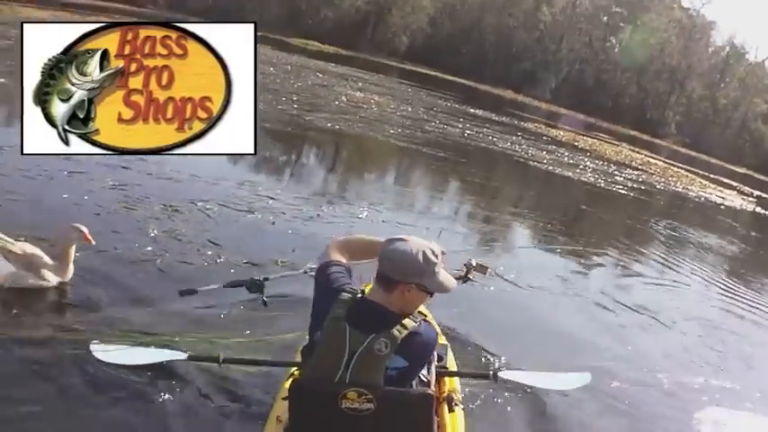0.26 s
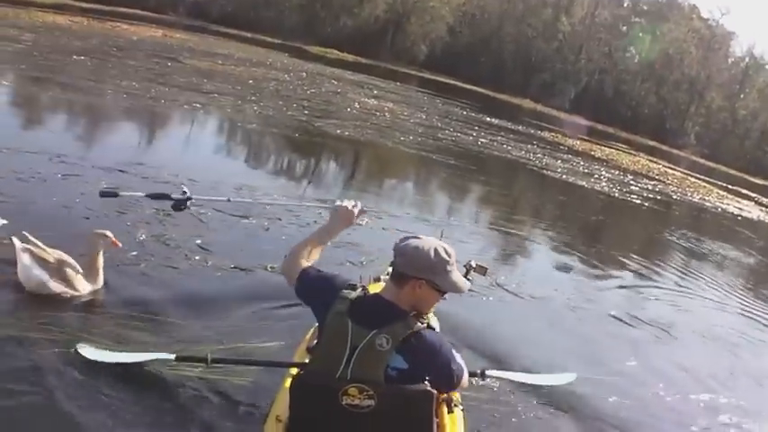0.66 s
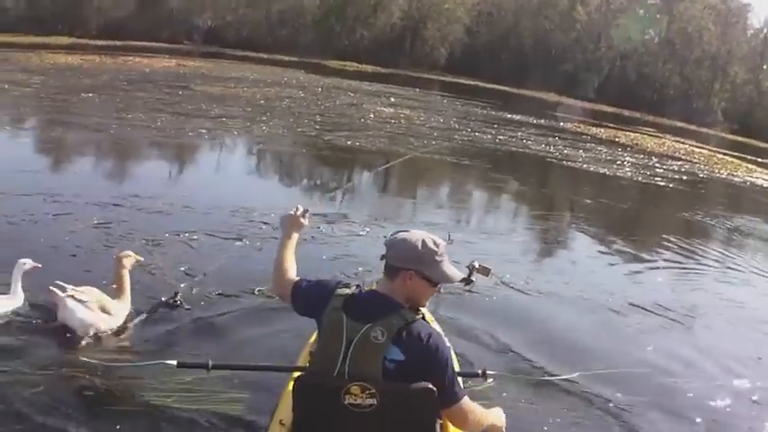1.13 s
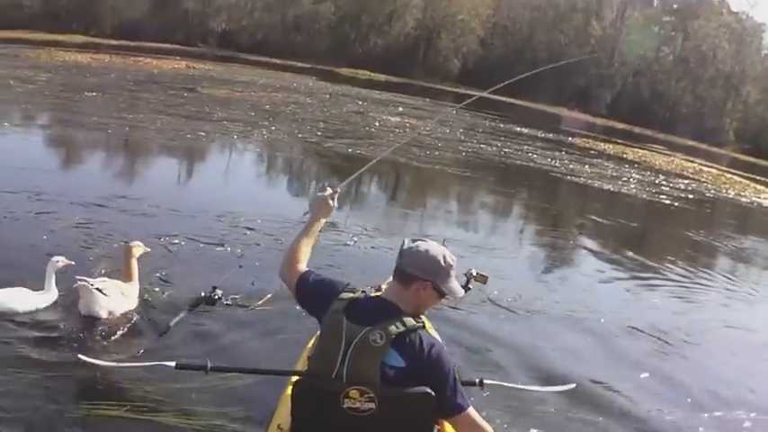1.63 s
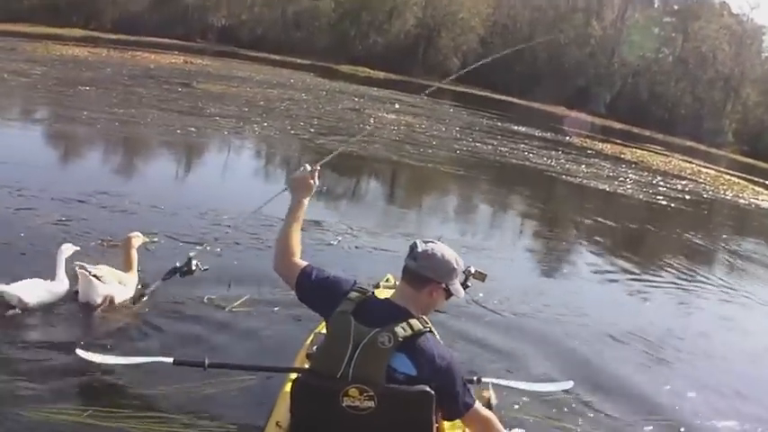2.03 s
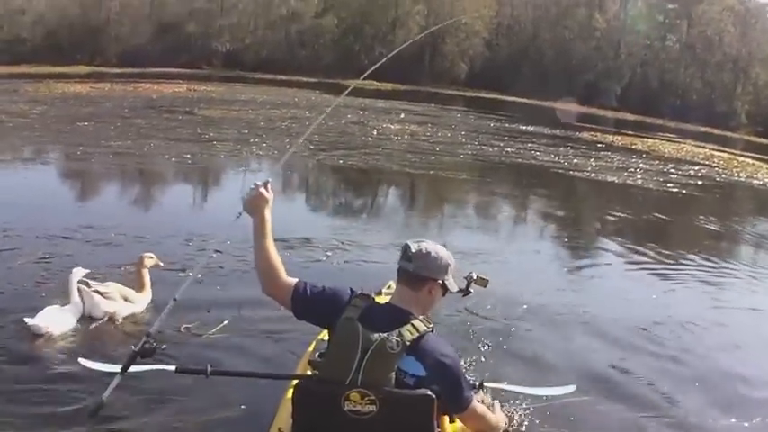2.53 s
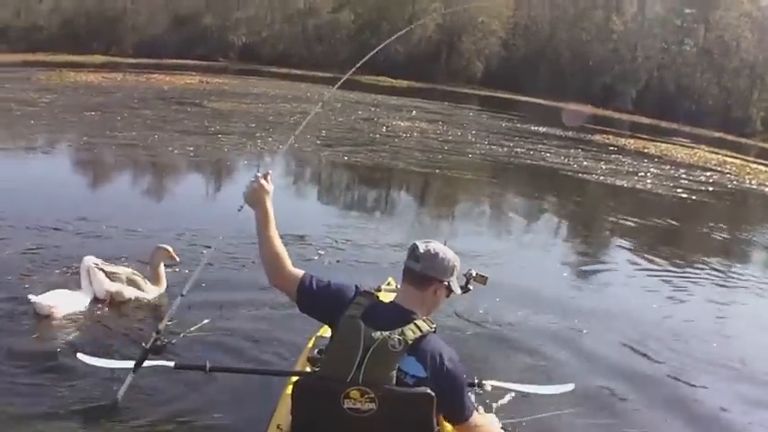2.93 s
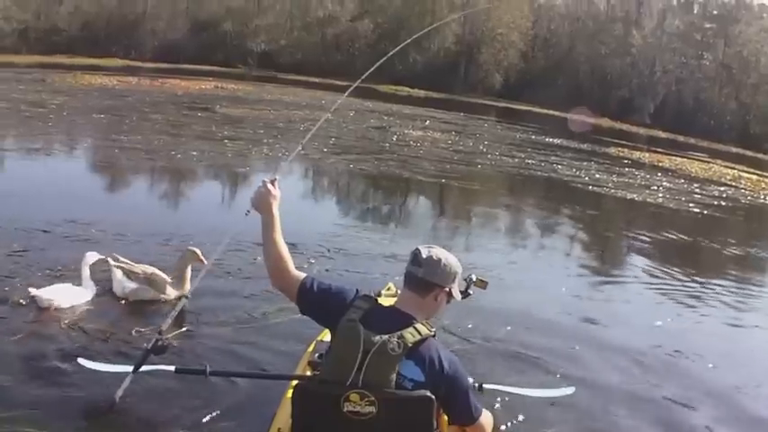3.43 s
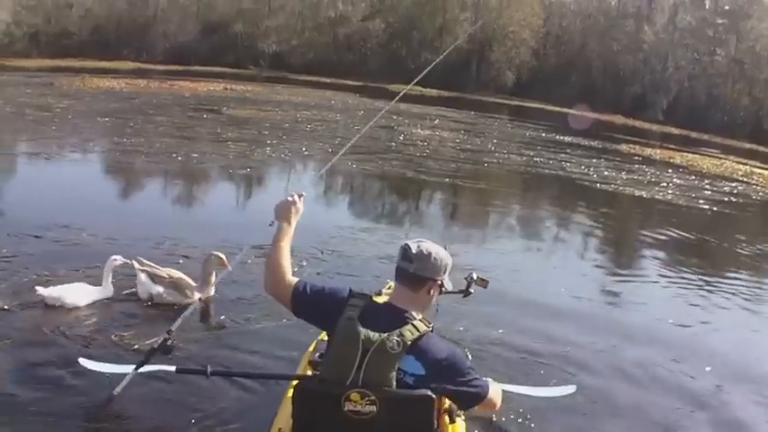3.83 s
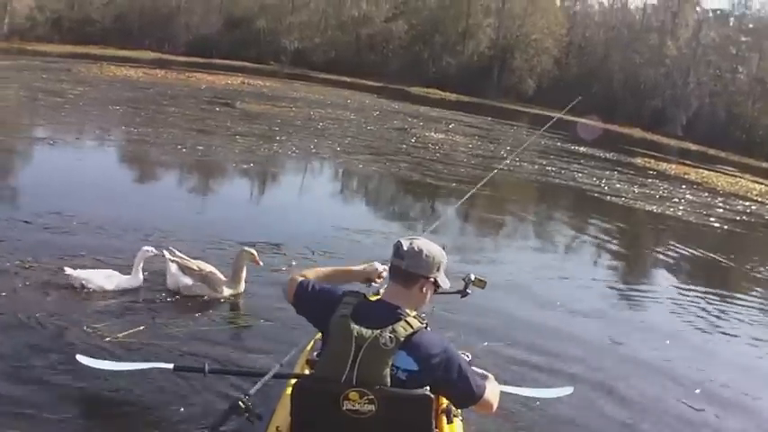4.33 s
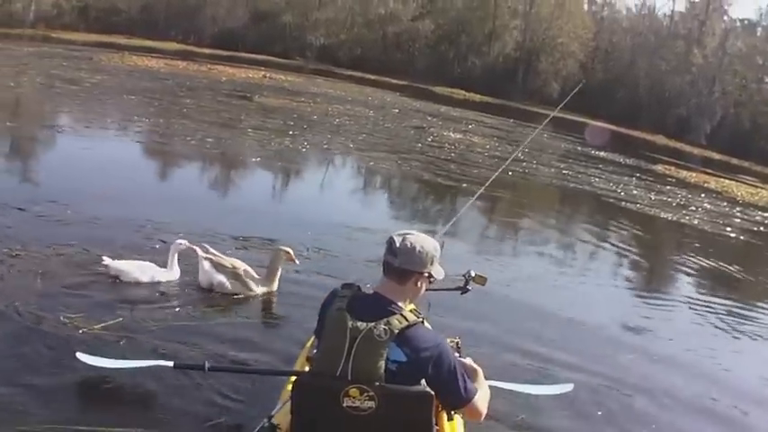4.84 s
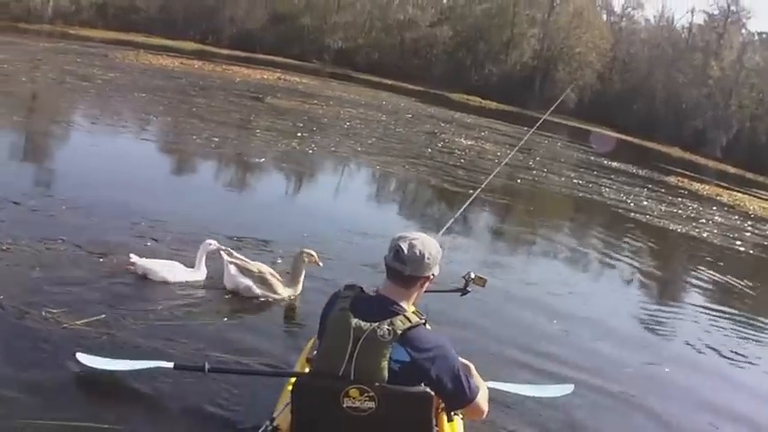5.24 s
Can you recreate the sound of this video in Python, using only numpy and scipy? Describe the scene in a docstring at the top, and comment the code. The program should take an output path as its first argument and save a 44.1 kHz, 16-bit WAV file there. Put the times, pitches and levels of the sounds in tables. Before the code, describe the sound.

Water splashes, bubbles and sloshes beside a kayak, with small metal jingles, low wind rumble and one sharp hard knock near the end.

```python
"""Water splashes and sloshes close beside a kayak on a calm river: crowds of ringing bubbles, droplets,
gurgles, plops and filtered surges. Small metal tackle jingles as groups of decaying modes; the plastic hull
takes bumps and one sharp knock, among faint high ticks, each a crack with ringing modes. Two close microphone
ports of a camera on the stern take uneven wind noise and single buffets, over faint hiss and a thin whine."""
import sys
import numpy as np
from scipy import signal
from scipy.fft import rfft, irfft
from scipy.io import wavfile
from scipy.ndimage import uniform_filter1d

SR = 44100
rng = np.random.default_rng(int(sys.argv[2]) if len(sys.argv) > 2 else 0)


def dump(signal):
    """Clip the signal to [-1, 1] and save it as 16-bit WAV at the path in sys.argv[1]."""
    limited = np.clip(np.atleast_2d(signal).T, -1, 1)
    pcm = np.round(limited * 32767).astype(np.int16)
    wavfile.write(sys.argv[1], SR, pcm)


N = 242197
TIME = np.arange(N) / SR

# Hiss under everything. Each row: frequency in Hz, relative density in dB.
HISS_SPECTRUM = [(30, 2), (200, 1), (500, 0), (1500, -2), (3000, -5), (6000, -7), (9000, -13), (12000, -11),
                 (15500, -11.5)]
# Low turbulence at the microphone. Each row: frequency in Hz, relative density in dB.
WIND_SPECTRUM = [(15, 0), (30, 0), (60, -4), (120, -7.5), (200, -19), (400, -32), (800, -52)]
# Strength of the breeze, before puffs and port gains. Each row: time in seconds, level in dB.
BREEZE_LEVEL = [(0, -36), (.45, -34.5), (.67, -46.5), (.85, -34), (1.05, -47.5), (1.23, -29.5), (1.38, -39),
                (2.35, -33.5), (2.8, -45.5), (3.4, -34), (3.7, -46), (4.22, -37.5), (4.42, -47),
                (4.59, -37), (5.07, -32.5), (5.23, -50), (5.35, -36.5), (5.49, -37.5)]
# Single eddies striking the ports. Each row: centre in seconds, level of the left port in dB,
# pitch in Hz, right port relative to left in dB.
EDDIES = [(0.089, -17, 103, -13), (1.487, -24.5, 89, -2), (2.399, -24, 80, -9.5), (2.549, -28.5, 60, -5),
          (3.045, -26.5, 39.3, -4.5), (3.378, -15, 114, -20), (4.028, -26.5, 110, -8.5),
          (4.72, -18, 112.3, -7), (5.032, -20.5, 105.5, 1), (5.076, -7.5, 125, -12), (5.345, -21, 138, -32)]
# Faint gliding whistles. Each row: start in seconds, length in seconds, level in dB,
# first pitch in Hz, last pitch in Hz.
WHISTLE_GLIDES = [(3.66, .125, -62, 4150, 3760), (4.062, .065, -58, 476, 950)]
# Faint high ticks, some perhaps of the tackle, with bumps and water slaps on the hull.
# Each row: start in seconds, level in dB, brightness in dB an octave.
BLOWS = [(0.0239, -31.5, 10), (.157, -38.5, 3), (0.416, -30, -9), (.497, -29.5, -7), (.526, -28, -6),
         (1.437, -24, 0), (1.785, -18.5, 0), (2.0126, -19, 10), (2.076, -18.5, 7), (2.603, -41, 22),
         (3.155, -48, 22.5), (3.349, -40, 5), (4.062, -44, 12), (4.377, -43, 24), (4.5874, -6.5, 3.5),
         (4.7652, -44, -2), (4.8924, -35.5, -4)]
# Modes of the hull and the gear lying on it, before each blow's small detuning.
# Each row: frequency in Hz, relative level in dB, time to fade by 60 dB in seconds.
HULL_AND_GEAR_MODES = [(407, -9, 0.13), (587, -1.5, 0.075), (710, -1.5, 0.085), (985, 6.5, 0.036),
                       (1203.7, 0.5, 0.047), (1697, 6.5, 0.015), (1917, 1, 0.028), (2290, -3.5, 0.042),
                       (2440, -5.5, 0.0323), (2563, -7.5, 0.04), (2860, 0.5, 0.016), (3440, -8.5, 0.03),
                       (4636, -11, 0.037), (5040, -16, 0.015), (7040, -9.5, 0.0097)]
# Shakes of the tackle; where it is struck decides which rings speak. Each row: start in seconds,
# chatter time in seconds, then the level in dB of each of four rings, low to high.
SHAKES = [(1.156, 0.0088, -38, -27.5, -28, -47), (1.183, .012, -27, -28.5, -34, -49),
          (1.328, .014, -32.5, -42, -28.5, -29), (1.657, .0065, -37.5, -36, -31, -48),
          (1.8897, .005, -27, -27, -42, -29), (1.917, .028, -38, -32, -28, -37),
          (1.962, .01, -41, -36, -31, -45), (2.0104, .007, -19, -18, -19, -32),
          (2.045, 0.011, -30, -34, -43, -44), (2.069, 0.0057, -28, -28, -30.5, -34),
          (2.1766, 0.0059, -34.5, -29.5, -34, -44), (2.3095, 0.0066, -25, -18.5, -25, -23),
          (2.35, .012, -36.5, -36, -34, -42), (2.5068, .024, -32.5, -39, -35.5, -46),
          (2.545, 0.013, -46, -43, -37, -45), (2.8515, 0.011, -58, -53, -56, -67),
          (3.3102, .022, -45.5, -45, -41.5, -52), (3.352, 0.0048, -46, -53, -54, -55),
          (4.317, .005, -48, -49, -39, -64), (4.4834, .022, -42, -45, -42.5, -49),
          (4.8185, 0.0091, -55, -60, -50, -59)]
# Metal modes; those of one ring sound together. Each row: ring number from 0, settled frequency in Hz
# before each shake's detuning, relative level in dB, time to fade by 60 dB in seconds.
METAL_MODES = [(0, 6485, -7.5, .42), (0, 6548, -4, .12), (0, 6640, -5, .05), (1, 9125, -8.5, .16),
               (1, 9230, -2, .06), (1, 9760, -9, .035), (2, 11940, -6, .07), (2, 12085, -6, .16),
               (2, 12290, -6, .06), (2, 12540, -10, .06), (2, 15250, -9, .09), (3, 13440, -2, .09),
               (3, 13560, -6, .13)]
# Water trickling back after the splashes. Each row: time in seconds, level in dB.
TRICKLE_LEVEL = [(.7, -75), (1.2, -45), (2.35, -50), (2.7, -63), (3.35, -56), (3.6, -70)]
# Air pockets closing. Each row: start in seconds, level in dB before the 1 dB lift in plops(),
# first pitch in Hz, pitch rise in octaves a second.
AIR_POCKETS = [(.436, -23.5, 446, 7.5), (.497, -27, 337, -6), (.575, -24, 265, -4), (1.04, -23.5, 787, 19),
               (1.138, -14.5, 732, -7.5), (1.154, -21, 1300, 32), (1.282, -17.5, 288.9, -2.5),
               (1.924, -16.5, 540, 2), (1.939, -17, 463.6, -5), (2.243, -35, 1378, 58),
               (2.276, -27.5, 2800, -7), (2.288, -27, 1600, 57), (3.037, -37, 1278, 1),
               (3.228, -34, 558.5, 52), (3.488, -40, 1102, 12), (4.489, -41, 5100, -3),
               (4.698, -37, 2340, 1), (4.791, -40, 1300, -3), (4.819, -28, 1020, 103),
               (4.831, -34.5, 3520, 3.5), (4.893, -26, 680, 4.5)]
# Deep heaves of water. Each row: centre in seconds, level in dB, Gaussian half width in seconds.
HEAVES = [(0.095, -42, 0.12), (0.435, -31.5, 0.026), (0.53, -36.5, 0.03), (1.262, -32, 0.046),
          (1.479, -35.5, 0.0301), (1.779, -31, 0.0074), (2.355, -43, 0.039), (3.38, -40, .015)]
# Broad smacks against the side. Each row: centre in seconds, level in dB, Gaussian half width in seconds.
SIDE_SMACKS = [(1.7822, -18, 0.0044), (2.024, -24, 0.0085)]
# Hollows in the water that gurgle as they open or close. Each row: start in seconds, length in seconds,
# level in dB, first pitch in Hz, last pitch in Hz.
HOLLOWS = [(1.012, 0.039, -35.5, 1700, 2060), (1.107, .018, -28, 795, 940), (1.286, 0.024, -34, 1150, 1700),
           (1.51, .045, -39.5, 1277, 1520), (1.564, .085, -41.5, 1200, 620),
           (1.619, 0.024, -34.5, 1193, 950), (1.863, 0.036, -34, 620, 720), (2.158, .045, -39, 560, 380),
           (2.397, .05, -42, 1246, 2710), (2.734, 0.044, -45.5, 1250, 518), (2.857, 0.029, -49, 600, 2420)]
# Spray thrown up and falling back. Each row: time in seconds, level in dB before the 5 dB lift in spray().
SPRAY_FORCE = [(0, -51), (.7, -63), (.84, -45.5), (.99, -51.5), (1.03, -40), (1.22, -37.5), (1.45, -43),
               (1.95, -40.5), (2.15, -45), (3, -61.5)]
# Colour of the droplets. Each row: frequency in Hz, gain in dB.
DROPLET_SPECTRUM = [(300, -19), (900, -12), (2000, 4.5), (3100, -6), (4300, 1), (7000, 0), (10000, -2),
                    (12000, -0.5), (15500, -7.5)]
# Size of the trapped air pockets. Each row: time in seconds, typical bubble pitch in Hz.
BUBBLE_PITCH = [(0, 526), (.55, 483), (.82, 1000), (1.55, 1490), (1.94, 1000), (2.2, 745), (2.45, 1160),
                (3.3, 950)]
# Separate sloshes beside the boat. Each row: start in seconds, level in dB,
# time to fade by 20 dB in seconds.
SLOSH_SURGES = [(-.03, -38.5, 0.48), (.2, -39, 0.46), (0.402, -31.5, 0.08), (.497, -40.5, 0.01),
                (.73, -50.5, 4), (.8, -31, 0.6), (1.0, -33.5, 0.2), (1.093, -27.5, 0.29), (1.27, -34, 0.2),
                (1.5, -46, 1), (1.59, -37, 0.34), (1.76, -32.5, 0.3667), (1.904, -27, 0.1341),
                (1.99, -31.5, 0.2092), (2.149, -38.5, 0.13), (2.3, -48, 0.46), (2.405, -47, 0.0574),
                (2.72, -51, 0.07), (3.211, -43.5, 0.18)]


def amp(db):
    """Decibels to gain."""
    return 10 ** (np.asarray(db) / 20)


def unit(x):
    """Scales to an rms of one."""
    return x / np.sqrt(np.mean(x ** 2) + 1e-20)


def curve(rows):
    """A table of (seconds, value) at every sample."""
    return np.interp(TIME, *np.transpose(rows))


def colour(x, points):
    """Filters by a spectrum of (Hz, dB) points, joined on a logarithmic frequency scale."""
    hz, db = np.transpose(points)
    bins_hz = np.fft.rfftfreq(N, 1 / SR)
    gain_db = np.interp(np.log(bins_hz + 1), np.log(hz), db)
    return irfft(rfft(x) * amp(gain_db), N)


def wander(rate_hz):
    """Slow random motion of rms one."""
    knots = rng.standard_normal(1500)
    return unit(np.interp(2 * rate_hz * TIME, np.arange(len(knots)), knots))


def add(mix, s, sound):
    """Mixes a sound in at time s."""
    part = mix[..., max(round(s * SR), 0):][..., :sound.shape[-1]]
    part += sound[..., :part.shape[-1]]


def ports(x, lead, left_db):
    """Two close microphone ports: the left hears the sound lead samples sooner, left_db louder."""
    turn = np.exp(1j * np.pi * np.fft.rfftfreq(N) * lead)  # half the lead for each port
    spectrum = rfft(x)
    left = irfft(spectrum * turn, N) * amp(left_db / 2)
    right = irfft(spectrum / turn, N) / amp(left_db / 2)
    return np.array([left, right])


def bubble(hz, rise, t60, onset_cycles=0.56):
    """An air pocket rings and dies away, its pitch moving by rise octaves a second, up 1.5 octaves at most."""
    t = np.arange(int(t60 * SR) + 8) / SR
    turns = np.cumsum(hz * 2 ** np.minimum(rise * t, 1.5)) / SR
    decay = np.exp(-np.log(1000) * t / t60)
    return np.sin(2 * np.pi * turns) * decay * (1 - np.exp(-turns / onset_cycles))


def impacts(per_s, spread_db):
    """Sparse random clicks, a few of them large."""
    train, count = np.zeros(N), int(per_s * N / SR)
    at, size, sign = rng.random((4000, 3))[:count].T
    heights = amp(-spread_db * np.log(np.maximum(size, .04)))
    train[(at * N).astype(int)] = heights * np.sign(sign - .5)
    return train


def steady(x, window_s):
    """Evens out slow swells and keeps the grain."""
    window = int(window_s * SR)
    power = uniform_filter1d(uniform_filter1d(x ** 2, window), window)
    return x / np.sqrt(abs(power) + 0.02 * np.mean(x ** 2))


def swells(rows):
    """Sums Gaussian surges of (centre s, level dB, half width s)."""
    return sum(amp(db) * np.exp(-.5 * ((TIME - s) / width) ** 2) for s, db, width in rows)


def glide(length, first_hz, last_hz):
    """A complex tone that slides between two pitches, swelling and fading."""
    u = np.linspace(0, 1, max(int(length * SR), 64))
    phase = 2 * np.pi * np.cumsum(first_hz * (last_hz / first_hz) ** u) / SR
    return np.exp(1j * phase) * np.sin(np.pi * u ** .75)


def background(hiss_db=-51.0, whine_db=-40.0, whine_hz=7867, left_db=0.34):
    """Even hiss and the camera's thin electrical whine, out of step between the channels."""
    noise = rng.standard_normal((2, N)) + 0.53 * rng.standard_normal(N)  # own to each channel, plus shared
    hiss = amp(hiss_db) * unit(colour(noise, HISS_SPECTRUM)) * amp([[left_db], [0]])
    phase = 2 * np.pi * whine_hz * TIME + np.array([[0], [1.4]])
    return hiss + amp(whine_db) * unit(np.sin(phase))


def whistles():
    """Thin clean tones whose pitch glides, faint beside the water."""
    out = np.zeros(N)
    for s, length, db, first_hz, last_hz in WHISTLE_GLIDES:
        add(out, s, amp(db) * unit(glide(length, first_hz, last_hz).real))
    return out


def wind(left_db=3.0, right_db=0.0, lumps_db=4.5, shared=0.0855, edge_db=-13, edge_growth=0.94):
    """Lumpy turbulence, partly separate at each port; strong gusts add a rougher upper edge."""
    puffs_db, puffs_hz = 1.5, 6  # the breeze comes in uneven puffs
    gust_db = curve(BREEZE_LEVEL) + puffs_db * wander(puffs_hz)
    edge_gain_db = edge_db + edge_growth * np.minimum(gust_db + 29.0, 10)
    edge_spectrum = [(60, 8.5), (160, 1.5), (300, -9.5), (600, -28.0), (1500, -104)]
    common, out = rng.standard_normal(N), []
    for port_db in (left_db, right_db):
        eddies = np.sqrt(shared) * common + np.sqrt(1 - shared) * rng.standard_normal(N)
        lumps = amp(lumps_db * wander(rate_hz=24.7))
        rumble = steady(unit(colour(eddies, WIND_SPECTRUM)) * lumps, window_s=0.12)
        edge = unit(colour(eddies, edge_spectrum)) * lumps
        out.append(amp(gust_db + port_db) * (rumble + edge * amp(edge_gain_db)))
    return np.array(out)


def buffets(width_cycles=0.35, flutter_db=-15, flutter_s=0.0061):
    """A single eddy gives the microphone a short push and pull with a fluttering edge."""
    out, t = np.zeros((2, N)), np.arange(-2048, 2048) / SR
    band = signal.butter(2, (150, 420), "band", fs=SR)
    for s, db, hz, right_db in EDDIES:
        flutter = unit(signal.lfilter(*band, rng.standard_normal((2, len(t))))) / np.cosh(t / flutter_s)
        push = -np.sin(2 * np.pi * hz * t) / np.cosh(t * hz / width_cycles)
        add(out, s + t[0], amp([[db], [db + right_db]]) * (push + amp(flutter_db) * flutter))
    return out


def knocks(crack_db=1, crack_s=0.00094, rattle_db=-9, rattle_s=0.011):
    """Each blow or tick is a short crack, a ring of the modes and a brief dull rattle."""
    out, t = np.zeros(N), TIME[:SR // 5]
    rattle_spectrum = [(80, 0.5), (500, -9.5), (2500, -9), (3800, -13), (7000, -19.5), (15000, -35)]
    crack_spectrum = [(200, -8.0), (1500, -5.0), (6500, 3), (9000, -4), (15000, -8)]
    rattle = unit(colour(rng.standard_normal(N), rattle_spectrum))
    crack = unit(colour(rng.standard_normal(N), crack_spectrum))
    bounce_s, bounce_db = .0124, -14  # every blow lands a second time, more softly
    bounces = [(s + bounce_s, db + bounce_db, tilt_db) for s, db, tilt_db in BLOWS]
    for s, db, tilt_db in [*BLOWS, *bounces]:
        ring = np.zeros(len(t))
        for hz, mode_db, t60 in HULL_AND_GEAR_MODES:
            level = amp(mode_db + tilt_db * np.log2(hz / 1500)) * rng.choice([-1, 1])
            tone = np.sin(2 * np.pi * hz * rng.uniform(0.98, 1.012) * t)
            ring += level * tone * np.exp(-np.log(1000) * t / t60)
        here = slice(round(s * SR), round(s * SR) + len(t))
        blow = ring / ring[:256].std()
        blow += amp(rattle_db) * rattle[here] * np.exp(-t / rattle_s)
        blow += amp(crack_db + tilt_db) * crack[here] * np.exp(-t / crack_s)
        add(out, s, amp(db) * blow / blow[:256].std())  # level is set by the first 256 samples
    return ports(out, lead=-0.51, left_db=1.5)


def tackle(scrape_db=-11, rebound=0.76):
    """Loose metal parts strike, chatter against each other and ring out, their pitch settling as they part."""
    out, t, head = np.zeros(N), TIME[:SR // 3], SR // 40  # levels are set by the first 25 ms
    hang_pull = .004  # the parts hang a little differently at each shake
    contact_pull, contact_s = .011, .014  # parts pressed together pull the pitch off until they separate
    group, hz, mode_db, t60 = np.transpose(METAL_MODES)[:, :, None]
    for s, chatter_s, *rings_db in SHAKES:
        pull, hang = rng.standard_normal((2, *hz.shape))
        tuned = hz * (1 + hang_pull * hang + contact_pull * pull * np.exp(-t / contact_s))
        modes = np.exp(2j * np.pi * np.cumsum(tuned, axis=1) / SR - np.log(1000) * t / t60)
        rings, ticks = np.zeros(modes.shape), np.zeros(len(t))
        for k in range(7):
            delay = chatter_s * k * rng.uniform(0.3, .5)
            turned = modes * np.exp(2j * np.pi * rng.random(hz.shape))  # a new phase at each strike
            add(rings, delay, rebound ** k * turned.real)
            add(ticks, delay, rebound ** k * rng.standard_normal(len(t)) * np.exp(-t / .0015))
        gains = amp(np.array(rings_db)[group.astype(int)] + mode_db)
        shake = (gains * rings / rings[:, :head].std(axis=1, keepdims=True)).sum(0)
        scrape = amp(scrape_db) * np.linalg.norm(gains) * ticks / ticks[:head].std()
        add(out, s, shake + scrape)
    return ports(colour(out, [(500, -18), (3000, -3), (6000, 1.0)]), lead=-0.38, left_db=0.5)


def trickle(per_s=8, cycles=32):
    """Separate small drips, each a short rising chirp."""
    out = np.zeros(N)
    for hz in np.geomspace(700, 3200, num=12):
        drip = bubble(hz, hz / 40, cycles / hz)
        out += signal.oaconvolve(impacts(per_s, spread_db=4), drip)[:N]
    return ports(unit(out) * amp(curve(TRICKLE_LEVEL)), lead=0, left_db=0)


def plops(level_db=1, slap_db=-11, slap_s=0.0044):
    """Single large bubbles, each begun by a small wet slap."""
    out = np.zeros(N)
    t60_at_1khz, size_law = 0.0492, 0.23  # seconds; bigger, deeper bubbles ring longer
    for s, db, hz, rise in AIR_POCKETS:
        ring = bubble(hz, rise, t60_at_1khz * (hz / 1000) ** -size_law)
        lowpass = signal.butter(2, min(3 * hz, 9000), fs=SR)
        slap = unit(signal.lfilter(*lowpass, rng.standard_normal(SR // 2)))[:len(ring)]
        slap = slap * np.exp(-TIME[:len(ring)] / slap_s)
        add(out, s, amp(db + level_db) * (ring + amp(slap_db) * slap))
    return ports(out, lead=-0.22, left_db=1.5)


def gulps():
    """Deep churning as a mass of water is shoved aside and falls back."""
    spectrum = [(70, -7.0), (150, 6.0), (270, 3.5), (400, -19.5), (700, -14.0), (2000, -71)]
    churn = unit(colour(rng.standard_normal(N), spectrum))
    return ports(steady(churn, window_s=0.11) * swells(HEAVES), lead=0, left_db=7.5)


def smacks():
    """A sheet of water meets the hull over several milliseconds."""
    spectrum = [(100, -7), (400, -0.5), (1400, 1), (2300, 0), (3000, -14), (4000, -5.5),
                (8000, -15), (15000, -26)]
    wet = unit(colour(rng.standard_normal(N), spectrum))
    return ports(steady(wet, window_s=0.0046) * swells(SIDE_SMACKS), lead=-.2, left_db=1.0)


def gurgles(width_share=.12):
    """Churning water excites a hollow whose resonance slides as it changes size."""
    out = np.zeros(N)
    for s, length, db, first_hz, last_hz in HOLLOWS:
        hollow = glide(length, first_hz, last_hz)
        # slow noise spreads the tone to either side by a share of its middle pitch
        lowpass = signal.butter(2, width_share * (first_hz + last_hz) / 2, fs=SR)
        churn = signal.lfilter(*lowpass, rng.standard_normal((2, SR // 4)))[:, -len(hollow):]
        add(out, s, amp(db) * unit(churn[0] * hollow.real + churn[1] * hollow.imag))
    return ports(out, lead=-.2, left_db=.5)


def spray(level_db=5, per_s=110, cycles=7, flicker_db=3, mist_db=-6, brighten=0.16):
    """Fine droplets patter on the surface; the harder the splash, the finer and brighter they are."""
    drops, force_db = np.zeros((2, N)), curve(SPRAY_FORCE)  # falling to the left and to the right
    for k, hz in enumerate(np.linspace(900, 15500, num=24)):
        grain = bubble(hz, 25, cycles / hz + 0.00048)
        tilt_db = brighten * (force_db + 48.0) * np.log2(hz / 4000)
        clump = amp(flicker_db * wander(rate_hz=33) + tilt_db)
        landings = unit(impacts(per_s, spread_db=2.0)) + amp(mist_db) * rng.standard_normal(N)
        drops[k % 2] += signal.oaconvolve(landings * clump, grain / np.linalg.norm(grain))[:N]
    left, right = colour(drops, DROPLET_SPECTRUM) / np.sqrt(24) * amp(force_db + level_db)
    return ports(left, lead=-.25, left_db=3) + ports(right, lead=-.65, left_db=-1)


def slosh_level(rise_s=0.026, hold_s=0.0039, ripple_db=-68):
    """Each slosh wells up, holds for a moment and dies away; their powers add to a faint ripple."""
    power = amp(ripple_db) ** 2
    for s, db, fade_s in SLOSH_SURGES:
        rise = np.clip((TIME - s) / rise_s, 0, 1)
        fading_s = np.maximum(TIME - s - rise_s - hold_s, 0)
        power = power + (rise * amp(db - 20 * fading_s / fade_s)) ** 2
    return np.sqrt(power)


def slosh(cycles=16, reach_octaves=1.34, cluster_db=6.5, foam_db=-12):
    """Clusters of bubbles, deep when the water heaves and higher when it breaks, in a little foam."""
    centre, water = np.log2(curve(BUBBLE_PITCH)), np.zeros(N)
    for pitches in np.geomspace(220, 2500, num=40).reshape(10, -1):
        cluster = amp(cluster_db * wander(rate_hz=14))  # bubbles of like size are born together
        cluster *= np.exp(-((np.log2(pitches.mean()) - centre) / reach_octaves) ** 2)
        for hz in pitches:
            ring_s = cycles * rng.uniform(0.82, 2.0) / hz
            grain = bubble(hz, rng.uniform(-.5, .8) / ring_s, ring_s)
            births = impacts(per_s=85, spread_db=4.5)
            water += signal.oaconvolve(births * cluster, grain / np.linalg.norm(grain))[:N]
    foam_spectrum = [(100, -21), (300, -5.0), (1000, 5.5), (2200, 1), (3000, -6.5), (8000, -46)]
    foam = colour(rng.standard_normal(N), foam_spectrum)
    water = steady(unit(water) + amp(foam_db) * unit(foam), window_s=.035)
    return ports(water * slosh_level(), lead=0.1, left_db=1.0)


def scene():
    """Water, boat and tackle in open air, with wind on the microphone."""
    air = background() + whistles() + wind() + buffets()
    boat = knocks() + tackle()
    water = trickle() + plops() + gulps() + smacks() + gurgles() + spray() + slosh()
    return air + boat + water


def record(dry):
    """The loudest peaks are rounded off below 0.7; then a low-pass limits the band."""
    held = dry / (1 + (dry / .7) ** 4) ** (1 / 4)
    edge_hz = 15500
    lowpass = signal.firwin(201, edge_hz, window=("kaiser", 8), fs=SR)
    return signal.oaconvolve(held, lowpass[None], "same")


dry = scene()
out = record(dry)
dump(out)
```